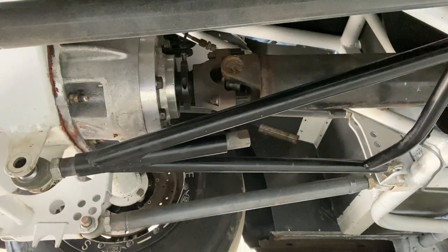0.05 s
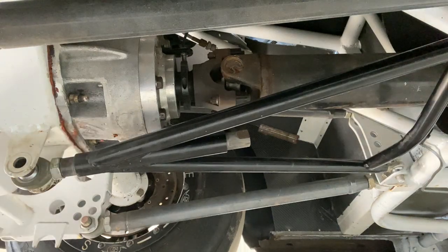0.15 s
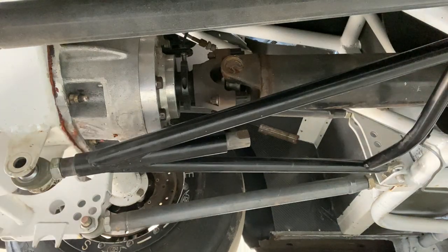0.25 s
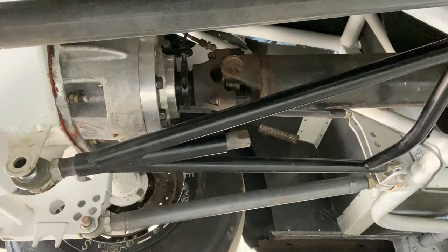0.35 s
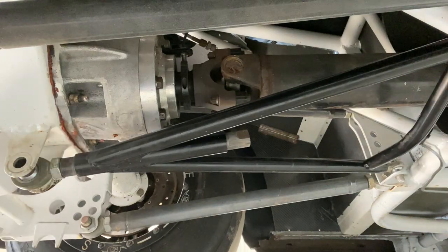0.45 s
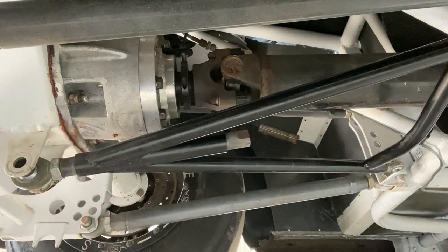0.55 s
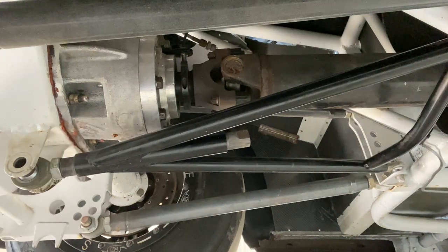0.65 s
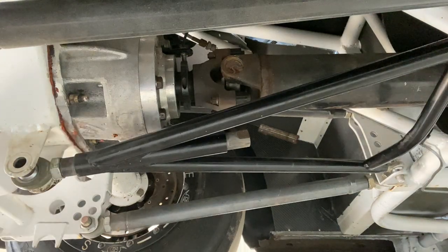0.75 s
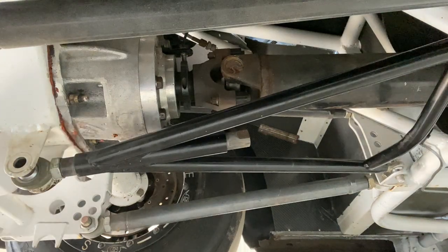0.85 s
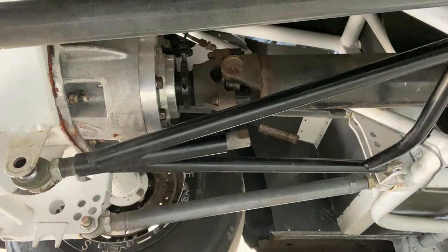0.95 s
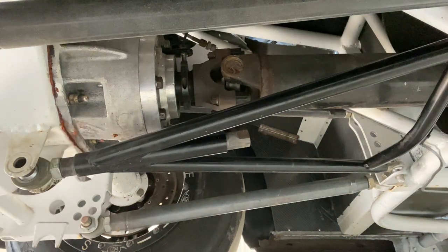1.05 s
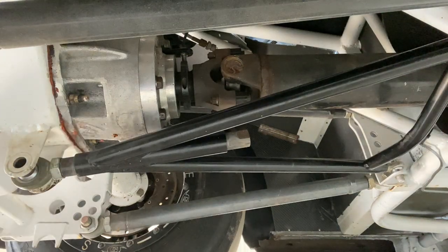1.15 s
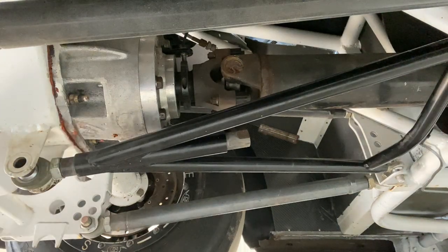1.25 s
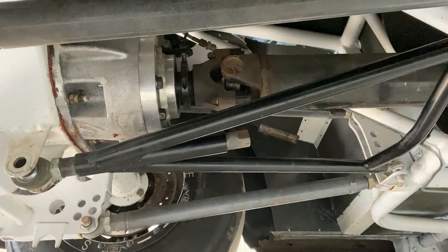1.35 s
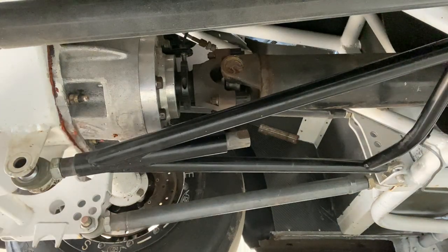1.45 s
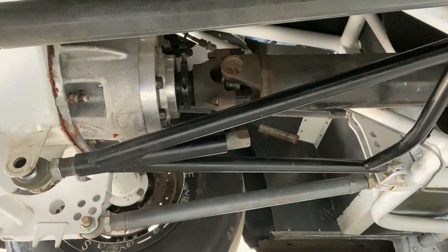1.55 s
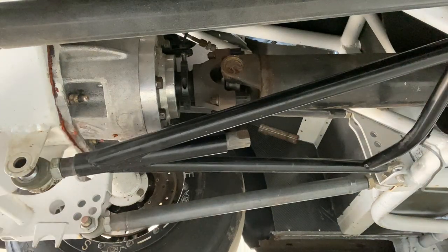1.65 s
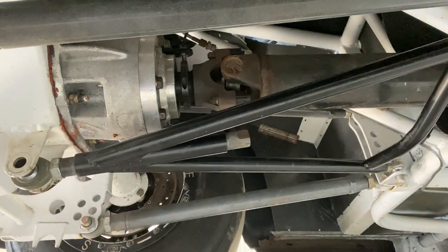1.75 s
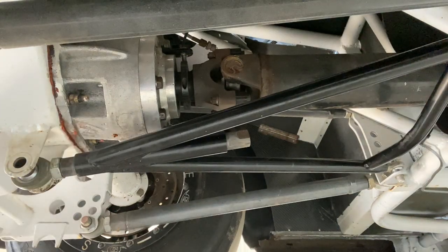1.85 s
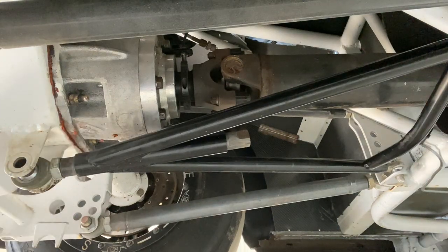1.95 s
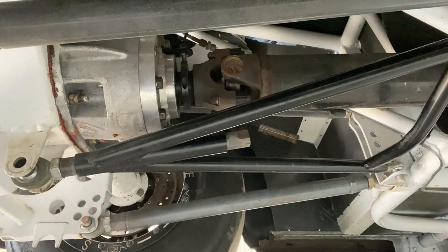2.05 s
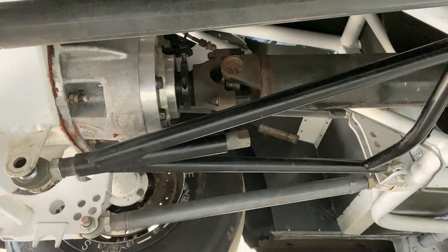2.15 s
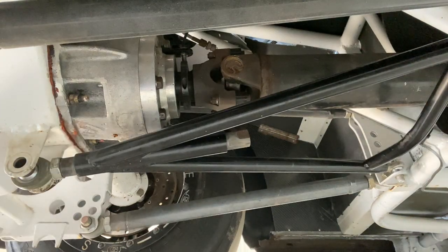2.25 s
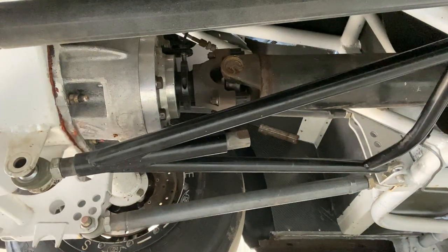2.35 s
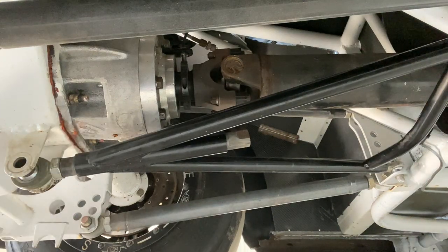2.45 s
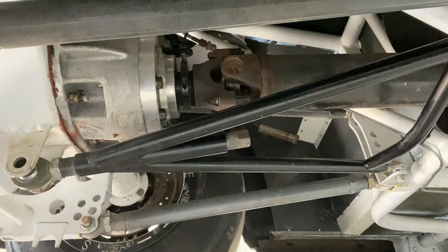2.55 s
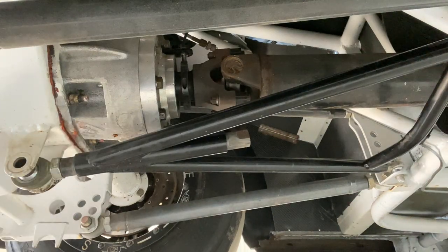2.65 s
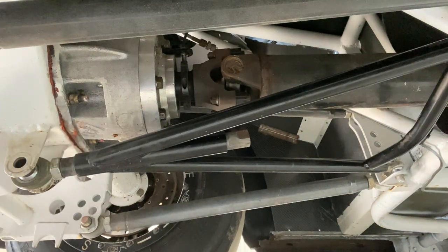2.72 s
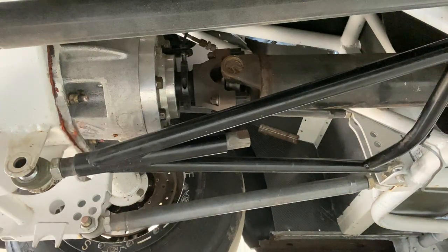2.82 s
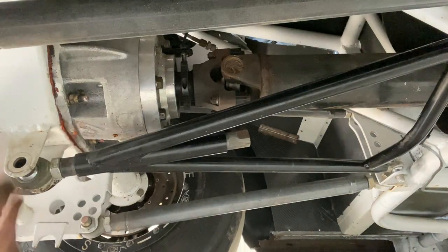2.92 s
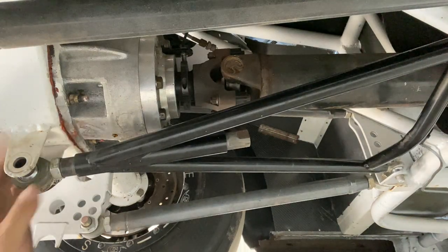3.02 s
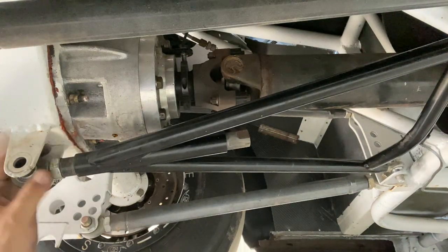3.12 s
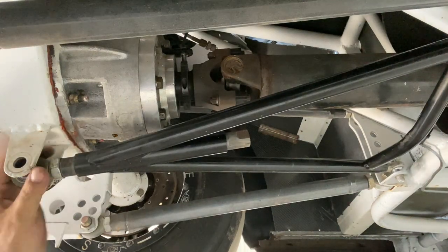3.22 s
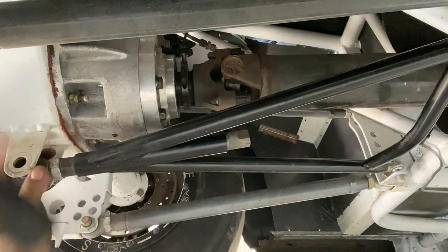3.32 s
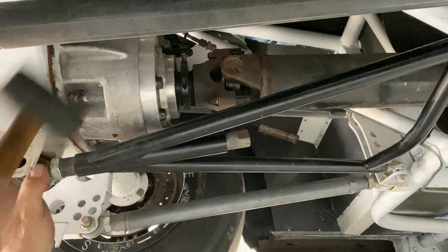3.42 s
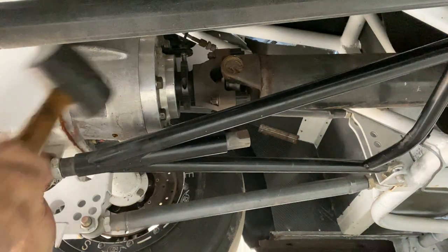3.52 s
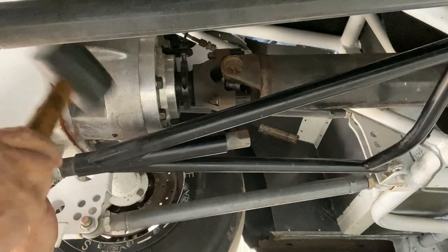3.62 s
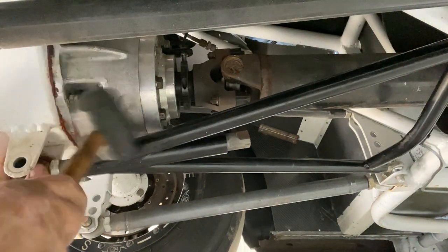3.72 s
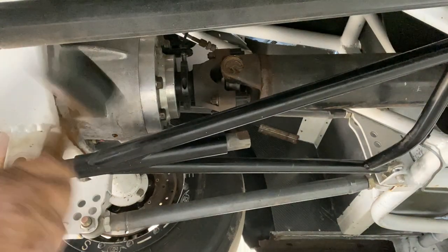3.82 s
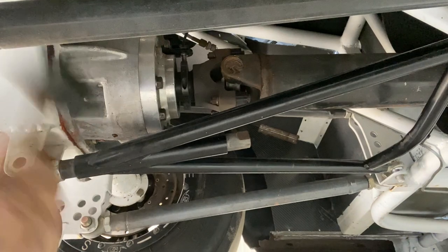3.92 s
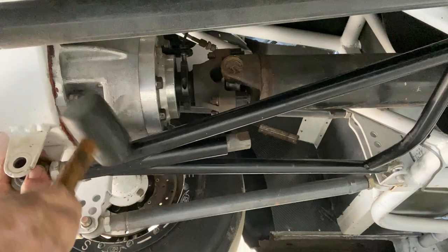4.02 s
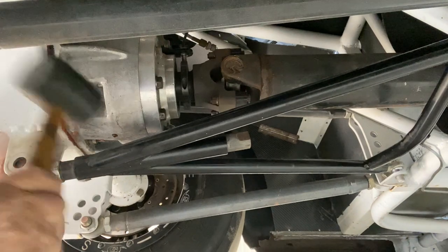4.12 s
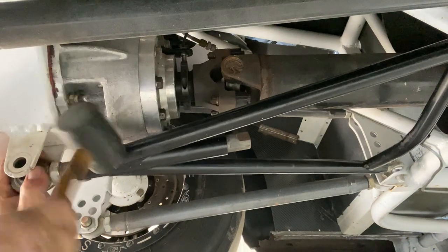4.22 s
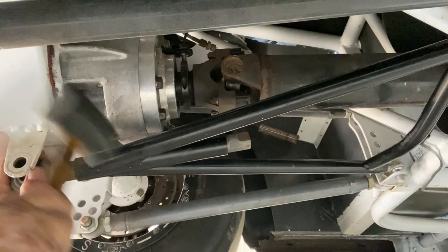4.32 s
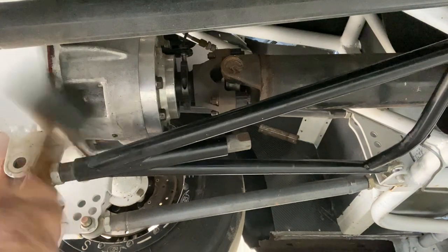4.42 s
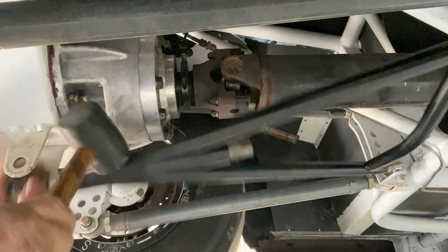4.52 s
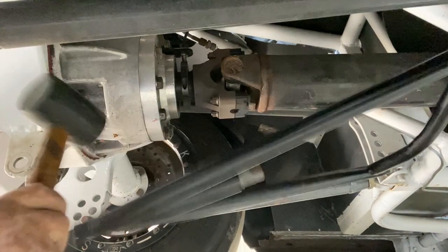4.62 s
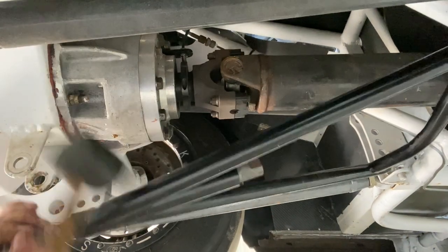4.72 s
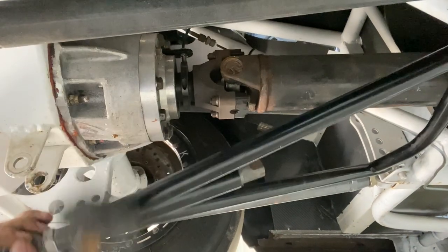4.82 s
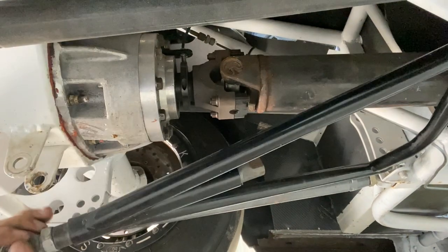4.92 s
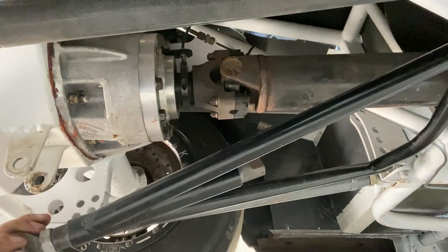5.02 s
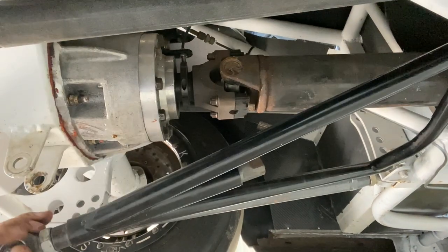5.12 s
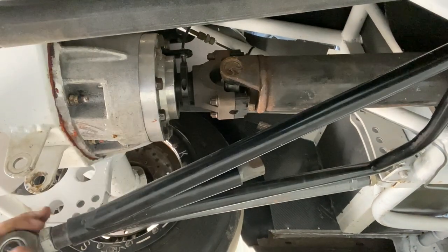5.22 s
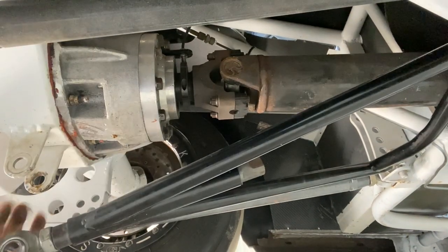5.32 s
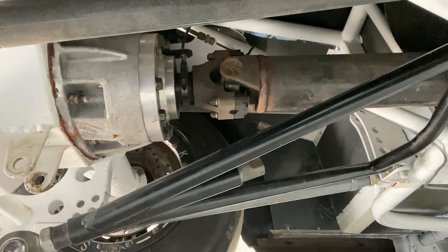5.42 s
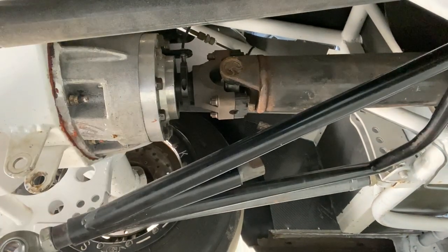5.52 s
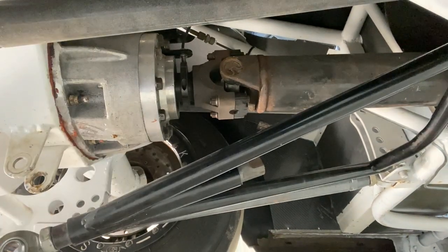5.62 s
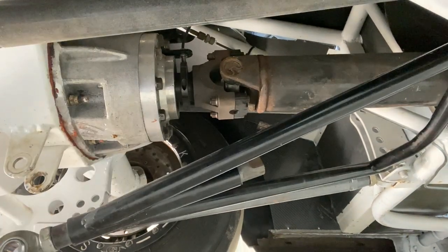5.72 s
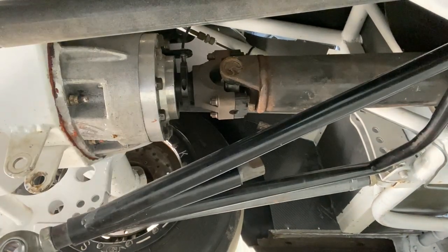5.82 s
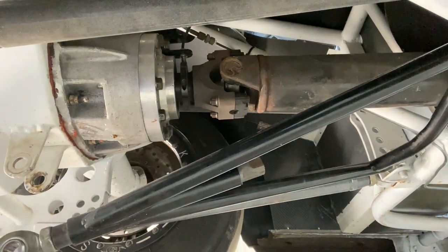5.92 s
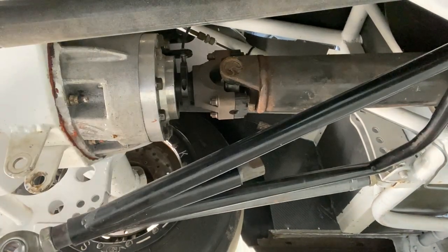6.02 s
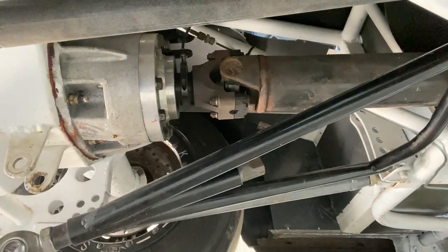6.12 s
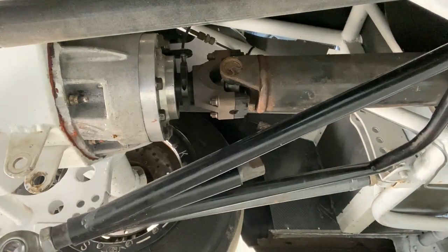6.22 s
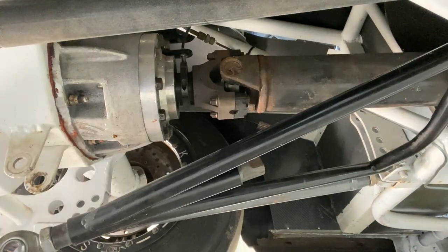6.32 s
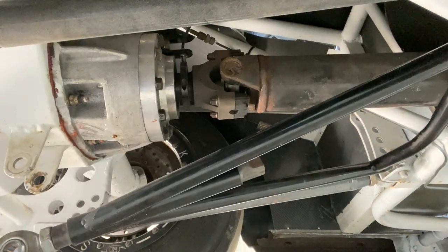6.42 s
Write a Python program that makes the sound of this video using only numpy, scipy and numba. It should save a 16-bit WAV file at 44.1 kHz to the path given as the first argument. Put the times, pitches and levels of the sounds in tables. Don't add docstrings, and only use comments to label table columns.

```python
import sys
import numpy as np
from scipy import signal
from scipy.fft import rfft, irfft, next_fast_len
from scipy.io import wavfile
from scipy.ndimage import uniform_filter1d, minimum_filter1d, map_coordinates
from numba import njit

SR = 44100
rng = np.random.default_rng(int(sys.argv[2]) if len(sys.argv) > 2 else 0)


def boost(x):
    u = np.asarray(x, float) / 20
    return 10 ** u


def generate_wav(signal):
    frames = np.transpose(np.atleast_2d(signal))
    scaled = np.clip(frames, -1, 1) * 32767
    pcm = np.round(scaled).astype(np.int16)
    wavfile.write(sys.argv[1], SR, pcm)


N = 284886
LEAD = 768
BLOW_PAN_DB, TICK_PAN_DB, CLANK_PAN_DB, CLINK_PAN_DB = -1.5, -1.4, -1.7, -1


def unit(x):
    return x / np.sqrt(np.mean(x ** 2) + 1e-20)


def along(points, hz):
    f, v = np.transpose(points)
    return np.interp(np.log(hz + 1), np.log(f + 1), v)


def wobble(rate):
    knots = rng.standard_normal(int(N * rate / SR) + 4)
    return map_coordinates(knots, [np.arange(N) * rate / SR])


def filtered(x, response):
    m = next_fast_len(x.shape[-1] + 8192)
    return irfft(rfft(x, m) * response(np.fft.rfftfreq(m, 1 / SR)), m)[..., :x.shape[-1]]


def pan(db):
    return boost([[db / 2], [-db / 2]])


def add(track, s, sound, pan_db=0):
    track[:, round(s * SR) - LEAD:][:, :SR] += sound * pan(pan_db)


# f/Hz, correlation [-1..1]
ALIKE = [(60, .94), (150, 0.71), (300, 0.52), (550, 0.36), (850, 0.04), (1100, 0.72), (1550, 0.21),
         (2100, 0.051), (5500, 0.016), (8000, 0.83)]


def rush(spectrum, size, tilt_db=0, peaky_db=0, near=False):
    knots = rng.standard_normal(1500)

    def gain(hz):
        modes_db = peaky_db * map_coordinates(knots, [hz / 16])
        slope_db = tilt_db * np.log2(np.maximum(hz, 900) / 2000)
        return boost(along(spectrum, hz) + slope_db + modes_db)

    def mid_side_gain(hz):
        alike = np.where((hz > 7000) & near, .99, np.clip(along(ALIKE, hz), -1, 1))
        turn = np.arccos(alike) / 2
        return gain(hz) * np.array([np.cos(turn), np.sin(turn)])

    mid, side = filtered(rng.standard_normal((2, size)), mid_side_gain)
    return unit(np.array([mid + side, mid - side]))


# f/Hz, t60/s; apart from that, near 9.3 kHz and above 14 kHz every
SHOP = [(100, 2), (400, 1.26), (1000, 1.11), (3000, 0.97), (7500, 0.66), (8300, .55), (9300, .16),
        (10400, 0.34), (13300, 0.55), (14300, .12)]


def burst(spectrum, dies, room_db, tilt_db=0, rise=0.00087, early_db=-24, peaky_db=4):
    noise = rush(spectrum, size=SR, tilt_db=tilt_db, peaky_db=peaky_db, near=True)
    hz, t, z = signal.stft(noise, SR, nperseg=256)
    t = np.maximum(t - LEAD / SR, 0)
    object_fade = boost(-60 * t / along(dies, hz)[:, None])
    room_fade = boost(room_db - 60 * t / along(SHOP, hz)[:, None])
    x = signal.istft(z * (object_fade + room_fade), SR, nperseg=256)[1][:, :SR]
    t = (np.arange(SR) - LEAD) / SR
    attack = 1 - np.exp(-np.maximum(t, 0) / rise)
    smear = boost(early_db + 1300 * np.minimum(t, 0)) * (t < .002)
    return x * attack + smear * filtered(x, lambda hz: hz < 7500)


def ring(modes, scatter_db, turns, waver=0.41, spread=1):
    hz, db, t60 = np.transpose(modes)[:, :, None]
    t = np.maximum(np.arange(SR) - LEAD, 0) / SR
    db = db + scatter_db * (2 * rng.random(hz.shape) - 1)
    turn = np.arccos(np.clip(along(ALIKE, hz), -1, 1)) / 2
    lag = turn * spread * rng.choice([-1, 1], hz.shape)
    start, beat = rng.uniform(0, 2 * np.pi, hz.shape), rng.uniform(5.8, 25, hz.shape)
    pair = 1 + np.clip(waver, 0, 1) * np.sin(2 * np.pi * beat * t + start)
    build_up = (1 - np.exp(-t * hz / turns)) ** 2
    size = boost(db - 60 * t / np.clip(t60, .02, 1.6)) * build_up * pair
    phase = 2 * np.pi * hz * t + start
    return np.array([(size * np.sin(phase + side * lag)).sum(axis=0) for side in (1, -1)])


# f/Hz, level/dB
WAVE = [(100, -3), (300, -1.5), (600, 1), (800, 0), (1000, 1)]
BEND_S, BEND_TOP_HZ = .2895, 1000
THUMP_TOP_HZ, MODE_SCATTER_DB = 200, 2.3


def struck(modes, thump_db=0, aside=0):
    hz, db, t60, sign = np.transpose(modes)[:, :, None]
    late = BEND_S * (hz ** -.5 - BEND_TOP_HZ ** -.5)
    t = np.maximum((np.arange(SR) - LEAD) / SR - late, 0)
    scatter_db = MODE_SCATTER_DB * (2 * rng.random(hz.shape) - 1)
    db = db + thump_db * (hz < THUMP_TOP_HZ) + along(WAVE, hz) + scatter_db
    waves = sign * boost(db - 60 * t / t60) * np.sin(2 * np.pi * hz * t)
    side = aside * (waves[::2].sum(axis=0) - waves[1::2].sum(axis=0))
    return waves.sum(axis=0) + np.array([side, -side])


def strokes(rows, rise, fall):
    s, held, db = np.transpose(rows)[:, :, None]
    t = np.arange(N) / SR - s
    level_db = db + rise * np.minimum(t, 0) - fall * np.maximum(t - held, 0)
    return np.sqrt((boost(level_db) ** 2).sum(axis=0))


# t/s, level/dB
AIR = [(0, -45.5), (1, -44), (1.6, -41.5), (2.6, -45), (3.3, -45.5), (3.7, -46.5), (5.1, -53.5), (5.8, -54),
       (6.46, -54)]
# f/Hz, density/dB per Hz
RUMBLE = [(18, -34.5), (30, -14), (59, -3), (108, 0.5), (129, -16.5), (162, -14.5), (183, -22.5),
          (250, -17), (320, -46), (550, -120)]
# f/Hz, density/dB per Hz
VENT = [(76, -40.5), (130, -7.5), (162, -3), (203, -18.5), (244, -4.5), (329, -11.5), (367, -5),
        (430, -13.5), (907, -9.5), (1050, -19), (1430, -12), (2500, -37), (3250, -64.5), (5500, -120)]
# f/Hz, density/dB per Hz
HISS = [(1060, -26), (1800, -1), (2370, -4), (2980, -7.5), (3350, -2), (3990, -9), (6180, -13), (7560, -18),
        (8750, -32.5), (11600, -33.5), (16000, -50.5)]
# f/Hz, level/dB rms
HUM = [(53.8, -45.5), (156.1, -54), (263.8, -74), (371.4, -60.5), (527.6, -63), (629.8, -63.5),
       (737.5, -62.5), (845.2, -63), (1109, -85), (1475, -65)]
VENT_DB, VENT_FOLLOWS = -5, 0.89


def workshop():
    t = np.arange(N) / SR
    hum = 0
    for hz, db in HUM:
        hum = hum + boost(db + 47 + 2.5 * wobble(9)) * np.sin(2 * np.pi * hz * t + .5 * wobble(8))
    rumble = boost(-1.5 + 1.0 * wobble(2.2)) * rush(RUMBLE, size=N) + boost(-1.0) * hum
    vent = boost(0.5 + 0.46 * wobble(0.76)) * rush(VENT, size=N, peaky_db=4.0)
    hiss = boost(-13.5 + 0.48 * wobble(5.6)) * rush(HISS, size=N, peaky_db=2.0)
    strength_db = np.interp(t, *np.transpose(AIR))
    start_db = strength_db[0]
    vent_db = start_db + VENT_DB + VENT_FOLLOWS * (strength_db - start_db)
    return boost(strength_db) * rumble + boost(vent_db) * (vent + hiss)


# t/s, level/dB
PINGS = [
    (0.954, -31),
    (.985, -29),
    (1.026, -23.5),
]
# t/s, f/Hz, level/dB, t60/s
CHIRPS = [(0.065, 7316, -48, 0.14), (0.933, 3970, -17.5, .17), (0.935, 301.6, -20.5, 0.39),
          (.934, 1295, -24, 0.2), (1.0, 535, -35, 1.6), (.96, 222, -31, .9), (.984, 6150, -26, .03),
          (1.82, 222, -38, .6), (1.202, 132.5, -26.5, 0.44), (1.8, 865, -24.5, 0.25),
          (1.8, 1600, -28, 0.18), (1.8, 301, -30, .4), (1.85, 523, -31, 0.56), (1.8, 790, -30, .55),
          (1.8, 897, -31, 0.31), (2.18, 713, -46, 1.8), (2.249, 488, -44, 1.9), (.941, 2606, -15.5, 0.13),
          (.941, 2354, -18, 0.12), (.938, 2825, -23.5, 0.11), (.934, 871, -17.5, 0.14),
          (0.934, 3200, -25, .06), (.935, 3640, -25, 0.11), (0.935, 1770, -29.5, .3), (.94, 2210, -30, .3),
          (1.801, 382, -32.5, 0.33), (1.8, 716, -34, 1.2), (1.8, 1319, -29, .4), (1.8, 1800, -36, .35),
          (2.176, 791, -35, 0.54), (2.176, 894, -36, .6), (2.175, 1290, -44, .24), (2.176, 1567, -33, 0.34),
          (2.176, 573, -35.5, .8), (2.176, 2170, -41, .2), (4.46, 2014, -22, 0.2),
          (4.459, 1803, -27.5, .17), (4.738, 1916, -32.5, 0.15), (4.738, 2099, -36, 0.16),
          (4.739, 3610, -33.5, 0.08), (4.738, 1370, -42.5, .4), (4.738, 3330, -36, .07),
          (5.027, 6000, -56, 0.28), (4.431, 940, -27, 0.087), (4.738, 1560, -25, 0.17),
          (4.75, 856, -19, 0.16), (4.93, 304, -35.5, 0.77), (5.03, 619, -29, 0.16), (5.53, 868, -37, 0.22),
          (5.899, 1113, -49, 0.11), (6.1, 1355, -49, 0.42)]
PING_HZ, PING_T60_S = 7316, 0.53


def singing_parts():
    track = np.zeros((2, N + SR))
    for s, db in PINGS:
        add(track, s, ring([(PING_HZ, db, PING_T60_S)], scatter_db=-1.1, turns=8.6, waver=0.09))
    for s, hz, db, t60 in CHIRPS:
        add(track, s, ring([(hz, db, t60)], scatter_db=0, turns=6, waver=.35, spread=.3))
    return track[:, :N]


# t/s, peak level/dB, low body/dB, brightness/dB per octave, room/dB
TICKS = [
    (0.0671, -45, -3.5, -9, 2.5),
    (3.3394, -49.5, -8, -1, 2),
    (4.6845, -33, -8, 9, 0),
    (5.026, -13.5, -14, 7, -3),
    (5.3649, -28.5, -3, -3, 0),
    (5.5325, -35, -11, -6.5, 3.5),
    (5.899, -61, -1, -4, -5),
]
# f/Hz, density/dB per Hz
TICK = [(710, -45), (1200, -33.5), (2300, -9), (2650, -70.5), (3020, -6), (6740, -3.5), (9270, -5),
        (11700, -9.5), (15900, -19), (16600, -41)]
# f/Hz, density/dB per Hz
TAP = [(700, -30), (1500, -19), (3000, -6.5), (6700, 2.5), (8500, -7), (11700, -11.5), (15900, -26),
       (16600, -41)]
# f/Hz, t60/s
CRACK_DIES = [(1000, 0.12), (4000, 0.074), (13000, 0.05), (15500, .016)]
PAN_TICK_S = 5.026


def ticks():
    track = np.zeros((2, N + SR))
    for s, db, low_db, tilt_db, room_db in TICKS:
        echo = .62 * (abs(s - PAN_TICK_S) < .01)
        tick = burst(TICK if echo else TAP, CRACK_DIES, room_db - 14.0, tilt_db, peaky_db=-2.5)
        tick = filtered(tick, lambda hz: 1 + echo * np.exp(-2j * np.pi * hz / 760))
        low_body = boost(low_db) * burst(CLANK, CRACK_DIES, room_db - 16.0)
        add(track, s, boost(db - 15) * (tick + low_body), TICK_PAN_DB)
    return track[:, :N]


# full at t/s, held/s, level/dB
RUSTLE = [
    (.222, .012, -78),
    (.44, .008, -83),
    (2.926, 0.16, -75.5),
    (3.19, 0.14, -82.5),
    (3.344, .006, -77),
    (4.94, 0.042, -81),
    (5.92, 0.0056, -81),
    (6.0, .07, -87),
    (6.09, .03, -81),
]
# f/Hz, density/dB per Hz
CLOTH = [(2500, -120), (4000, -1), (8000, -2), (12000, -2), (13700, 0), (14500, -20), (16500, -50)]


def cloth():
    return strokes(RUSTLE, rise=380, fall=200) * boost(7.0 + 2.3 * wobble(55)) * rush(CLOTH, size=N)


# t/s, peak level/dB, low body/dB, brightness/dB per octave, room/dB
CLANKS = [
    (0.9333, -2, -10.5, -1.5, -32.5),
    (0.9424, -9, -12.5, -8, -14.5),
    (1.027, -34.5, 0.5, 0, -6.5),
    (1.797, -13.5, -2, 2.5, 6.5),
    (2.1738, -22, -3.5, -2, 4.5),
    (2.232, -29.5, -1.5, -7, 3),
]
# f/Hz, density/dB per Hz
CLANK = [(88, -45.5), (150, -15.5), (287, -13), (619, -7), (832, 0.5), (1120, -10), (1330, -6.5),
         (1660, -7.5), (3430, -11.5), (4400, -13), (7550, -22), (9020, -36), (12400, -40), (16600, -60.5)]
# t/s, peak level/dB, low body/dB, brightness/dB per octave, room/dB
CLINKS = [
    (.9727, -13, -32, .1, -2),
    (.9843, -4.5, -19.5, 0.65, -0.5),
    (.996, -22, -20, .1, -0.4),
]
# f/Hz, density/dB per Hz
CLINK = [(180, -38.5), (300, -15.5), (558, -14.5), (909, -5), (1110, -8.5), (1530, -2.5), (6060, -4),
         (8620, -19.5), (11700, -11), (15800, -35), (16600, -99)]
# f/Hz, t60/s
CLANK_DIES = [(200, 0.37), (1000, 0.34), (4000, 0.16), (12500, 0.064), (15500, .05)]
# f/Hz, level/dB, t60/s
TOOL = [(1350, 5, 0.53), (1556, -2.5, .35), (1580, -9.5, 0.74), (1775, -5, .6), (1890, -12, .5),
        (2210, -10.5, .5), (2334, -3, .2), (2670, -10.5, 0.77), (2670, 4.5, .2), (2870, -6, 0.43),
        (3080, -2.5, 0.16), (3640, -6.5, .2), (4120, -1, 0.45), (4280, -13, .5)]
# f/Hz, level/dB, t60/s
TRAY = [(263, -8.5, 0.2), (307.6, -6.5, 1.1), (390, -10.5, 0.37), (486.4, -7.5, 1.3), (543, -7, 0.9),
        (590, -16, 0.5), (720, -12.5, 1.6), (799, -3, 1), (894, -8.5, 1.9), (942, -4, 0.64),
        (1403, -5, 0.32), (1550, -13, 0.68), (2220, -15, .35), (2315, -21.5, 1.9)]


def clanks(events, spectrum, pan_db):
    track = np.zeros((2, N + SR))
    short_tool = np.multiply(TOOL, [1, 1, .45])
    for s, db, low_db, tilt_db, room_db in events:
        clatter = burst(spectrum, CLANK_DIES, room_db - 18.5, tilt_db,
                        rise=0.0015, early_db=-21.0, peaky_db=4.0)
        steel = boost(-17 + tilt_db) * ring(short_tool, scatter_db=3, turns=3, waver=.8)
        tray = boost(low_db - 5.0) * ring(TRAY, scatter_db=4.5, turns=3.5, waver=0.75)
        add(track, s, boost(db - 7.0) * (clatter + steel + tray), pan_db)
    return filtered(track[:, :N], lambda hz: 1 / (1 + (200 / (hz + 1)) ** 6))


# full at t/s, held/s, level/dB
SLIDE = [
    (1.134, 0.086, -38.5),
    (1.25, 0.05, -34.5),
]
# f/Hz, density/dB per Hz
SKID = [(120, -44.5), (200, -8.5), (298, -7.5), (412, -8), (880, -2.5), (1150, -13), (3870, -17.5),
        (5800, -25.5), (7550, -41), (8720, -55.5), (10800, -46.5), (15000, -73)]


def skid():
    grating = boost(3.5 + 1.9 * wobble(40)) * rush(SKID, size=N, peaky_db=4.5)
    return strokes(SLIDE, rise=150, fall=67) * grating


# t/s, level/dB, rasp/dB
LEAD_INS = [
    (3.6995, -25, 0),
    (3.937, -27, 3),
    (3.949, -23, 0),
    (4.207, -25, 0),
    (4.4455, -23, 3),
]
# f/Hz, density/dB per Hz
THUD = [(35, -50), (60, -9.5), (123, 2.5), (203, -3.5), (449, -5), (517, -3.5), (664, -9), (921, -1),
        (1130, -20), (1900, -22), (2500, -45.5), (3250, -67.5), (5500, -120)]


def lead_ins():
    track = np.zeros((2, N + SR))
    for s, db, rasp_db in LEAD_INS:
        soft = burst(THUD, [(100, .12), (2500, .11)], -60, rise=.003, early_db=-61.5)
        rasp = burst(CLANK, [(1000, .12), (8000, 0.07)], -60, tilt_db=-1.5, rise=.004, early_db=-60.5)
        add(track, s, boost(db) * (soft + boost(rasp_db - 6) * rasp), BLOW_PAN_DB)
    return track[:, :N]


# t/s, peak level/dB, crack/dB, thump/dB, room/dB
BLOWS = [
    (3.706, -1, -6, 0.5, -0.5),
    (3.958, -2.5, -1, -3, 0),
    (4.215, -0.5, -1.5, -2.5, -2),
    (4.4588, 1.5, -2.5, -1, -3.5),
    (4.7364, -13, -7, 9.5, 5.5),
]
CRACK_TILT_DB = [-1, 0.5, 0, 1.5, -2]
# f/Hz, level/dB, t60/s, polarity at the ports
TUBES = [(441.2, -0.9, 0.053, 1), (476.0, -2.1, 0.157, 1), (508.5, -2.2, 0.191, 1), (518.5, -7.0, 0.274, 1),
         (587.1, 1.7, 0.053, 1), (617.9, -8.4, 0.246, -1), (665.6, -16.4, 0.324, 1),
         (718.1, 0.3, 0.166, -1), (740.3, -9.5, 0.298, -1), (796.1, -4.6, 0.184, 1),
         (858.0, -5.3, 0.194, -1), (889.7, -12.0, 0.292, -1), (909.0, -8.7, 0.257, 1),
         (971.4, -13.9, 0.33, -1)]
# f/Hz, level/dB, t60/s, polarity at the ports
SHELL = [(97.0, -5.6, 0.128, 1), (114.7, -14.1, 0.571, -1), (124.4, -11.5, 0.768, 1),
         (128.5, -14.3, 0.768, 1), (140.6, -11.1, 0.768, -1), (159.2, -1.7, 0.09, -1),
         (163.6, -12.8, 0.768, 1), (225.7, -16.1, 0.664, 1), (251.8, -16.4, 0.768, 1),
         (262.3, -8.8, 0.546, 1), (271.8, -14.3, 0.768, 1), (299.2, -6.5, 0.225, -1),
         (343.4, -8.9, 0.333, 1), (379.9, 1.3, 0.103, 1)]
# f/Hz, t60/s
THUD_DIES = [(100, 0.092), (400, 0.089), (1000, 0.24), (2500, 0.17)]
# f/Hz, level/dB, t60/s
BRACKET = [(1517, 3, 0.85), (960, 11.5, .5), (1800, 6.5, 0.066), (2620, -23.5, 0.16), (3730, -13.5, 0.45),
           (3880, -15, 0.03), (4200, -11.5, 0.12), (4330, -22, 0.13), (4840, -23.5, 0.1), (7800, -10, 0.3),
           (7710, -16.5, 0.2), (7900, -9, 0.13), (9500, -9, 0.14)]
# f/Hz, density/dB per Hz
CRACK = [(590, -28.5), (1000, -12.5), (1170, -7.5), (2020, -5), (2410, -10), (5900, -15), (7460, -15.5),
         (9110, -18), (12100, -20.5), (14200, -28.5), (16600, -56.5)]
MODES_DB, LOW_PAN_DB = -17, 4.5


def mallet():
    track = np.zeros((2, N + SR))
    damped_bracket = np.multiply(BRACKET, [1, 1, .25])
    for (s, db, crack_db, thump_db, room_db), tilt_db in zip(BLOWS, CRACK_TILT_DB):
        arm = struck(TUBES, aside=.45)
        shell = struck(SHELL, thump_db, aside=0.14) * pan(LOW_PAN_DB)
        modes = filtered(boost(MODES_DB) * (arm + shell), lambda hz: 1 / (1 + (75 / (hz + 1)) ** 6))
        body = boost(-22.5) * burst(THUD, THUD_DIES, room_db - 4, rise=0.0035, peaky_db=3)
        mount = boost(-17) * ring(damped_bracket, scatter_db=3, turns=1.2)
        crack = burst(CRACK, CRACK_DIES, room_db - 28.0, tilt_db, early_db=-25, peaky_db=-1.0)
        joint = boost(crack_db - 13.5) * (crack + mount)
        add(track, s, boost(db + 6.5) * (modes + body + joint), BLOW_PAN_DB)
        clap = burst(CRACK, [(1000, 0.02), (9000, 0.016)], -36.0, tilt_db, early_db=-56.5)
        add(track, s + .0038, boost(db + crack_db - 7) * clap, BLOW_PAN_DB)
    return track[:, :N]


REBOUND_S = [.012, .021, .012, .021, .0185]
REBOUND_DB = [-5, -4, -7, -5, -5]


def rebounds():
    track = np.zeros((2, N + SR))
    held_arm = np.multiply(TUBES, [0.92, 0.98, 0.44, 1])
    for (s, db, *_), late, back_db in zip(BLOWS, REBOUND_S, REBOUND_DB):
        add(track, s + late, boost(db + back_db - 10.5) * struck(held_arm, aside=.4), BLOW_PAN_DB)
    return track[:, :N]


# f/Hz, level/dB, t60/s
FREED = [(222, -10.5, .3), (304, -7, 0.45), (430, -5, 0.3), (470, -9.5, 0.23), (616, -8.5, 0.33),
         (707, -6, 0.24), (742, -7, 0.22), (790, -6, 0.3), (855, -4, 0.28), (880, -4.5, 0.27),
         (980, -11, .25), (1030, -13, 0.27), (1150, -22, 0.36), (1240, -32, 0.4)]
FREED_S, FREED_DB = 4.737, -15


def freed_arm():
    track = np.zeros((2, N + SR))
    free_ring = ring(FREED, scatter_db=1.0, turns=1.5, waver=0.93)
    add(track, FREED_S, boost(FREED_DB) * free_ring, BLOW_PAN_DB)
    return track[:, :N]


# full at t/s, held/s, level/dB
DRAG = [
    (5.434, 0.092, -44.5),
    (5.555, 0.064, -41),
    (5.645, 0.14, -39),
    (5.87, 0.065, -49.5),
    (5.99, 0.16, -58.5),
]
# f/Hz, width/Hz, level/dB
FRAME = [(513, 13, 5), (859, 12, 11.5), (1032, 17, -0.5), (1371, 21, 2), (1528, 4.4, 8.5), (1767, 6.3, 0.5)]
# f/Hz, density/dB per Hz
RUB = [(88, -47), (150, -12), (436, -6), (498, -2.5), (769, -8), (843, -5), (1200, -19.5), (1390, -18),
       (3500, -59), (4550, -73), (7700, -120)]


def drag():
    slips = boost(2.8 * wobble(130))

    def frame(f):
        return sum(boost(db) * 1j * f * w / (c * c - f * f + 1j * f * w) for c, w, db in FRAME)

    scrape = rush([(200, 1.5), (2500, -17.0), (5000, -34)], size=N)
    singing = unit(filtered(slips * scrape, frame))
    rubbing = unit(slips * rush(RUB, size=N))
    return strokes(DRAG, rise=500, fall=70) * boost(-4.5) * (singing + rubbing)


# f/Hz, level/dB
LEAN = [(60, 3.5), (110, 0.5), (200, 2), (380, 3), (700, 0.5), (1290, 6), (2380, 3.5), (4400, 0), (8120, 3),
        (15000, -0.5)]
# f/Hz, turn/radians
HOUSING_TURN = [(650, 0), (1100, 0.7), (1600, 1.65), (2100, -1.5), (3500, -3), (6500, 0.23), (9200, -1.35),
                (14400, 1.35)]
LEFT_LEAD_S = 0.0001764


def scene():
    mix = workshop() + singing_parts() + ticks() + cloth()
    mix += clanks(CLANKS, CLANK, CLANK_PAN_DB) + clanks(CLINKS, CLINK, CLINK_PAN_DB) + skid()
    mix += lead_ins() + mallet() + rebounds() + freed_arm() + drag()
    half = np.array([[.5], [-.5]])

    def ports(hz):
        turn = 2 * np.pi * hz * LEFT_LEAD_S + along(HOUSING_TURN, hz) * (hz > 400)
        return boost(half * along(LEAN, hz)) * np.exp(1j * half * turn)

    return filtered(mix, ports)


@njit
def released(need_db, keep):
    out, now = np.zeros(len(need_db)), 0.0
    for i in range(len(need_db)):
        now = min(need_db[i], now * keep)
        out[i] = now
    return out


def band_limit(x):
    return signal.sosfilt(signal.butter(12, 16810, fs=SR, output="sos"), x)


TOP_HZ, TOP_SLOPE_HZ = 16400, 110


def record(dry):
    def band(hz):
        top = 1 / (1 + np.exp((hz - TOP_HZ) / TOP_SLOPE_HZ))
        return top / np.sqrt(1 + (42 / (hz + 1)) ** 8)

    x = filtered(dry, band)
    over_db = np.minimum(-.6 - 20 * np.log10(np.abs(x).max(axis=0) + 1e-9), 0)
    need_db = minimum_filter1d(over_db, size=65)
    gain_db = uniform_filter1d(released(need_db, np.exp(-1 / (0.0074 * SR))), size=33)
    return band_limit(x * boost(gain_db))


dry = scene()
out = record(dry)
generate_wav(out)
```